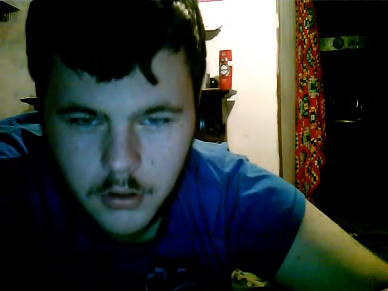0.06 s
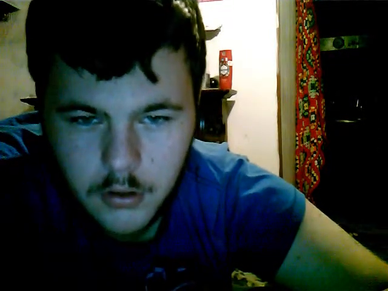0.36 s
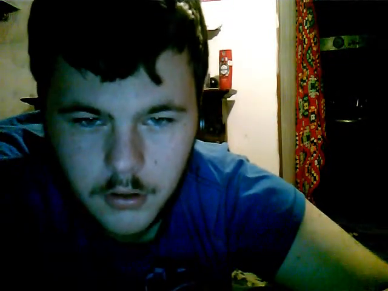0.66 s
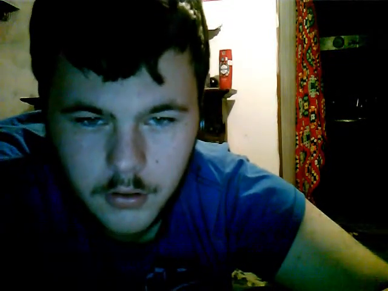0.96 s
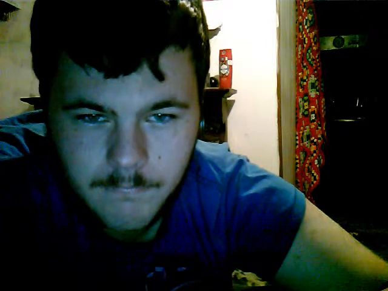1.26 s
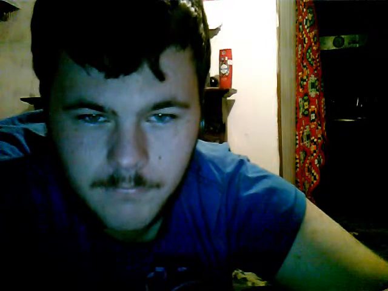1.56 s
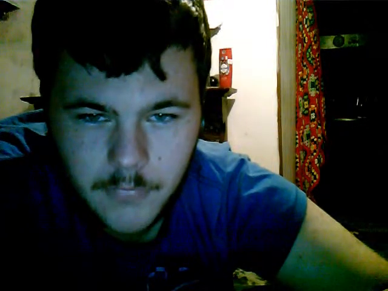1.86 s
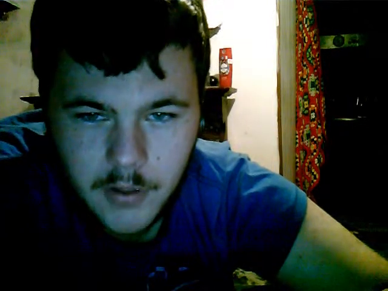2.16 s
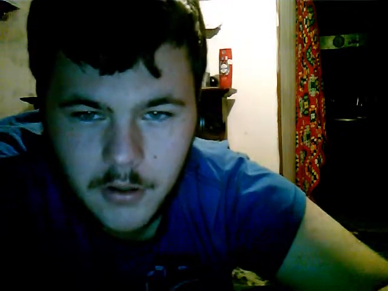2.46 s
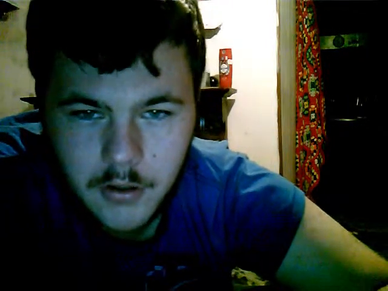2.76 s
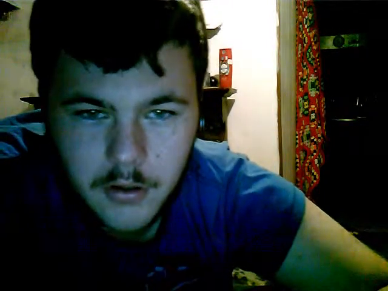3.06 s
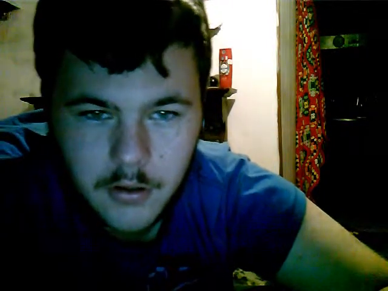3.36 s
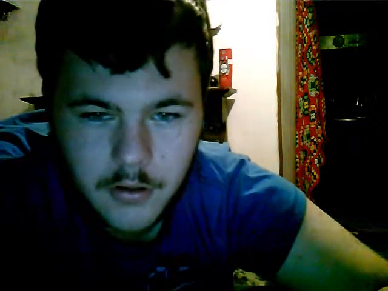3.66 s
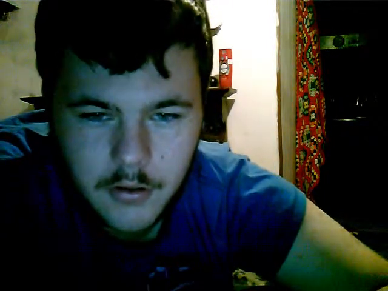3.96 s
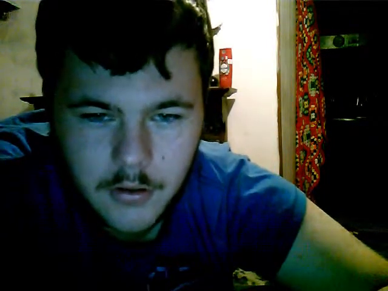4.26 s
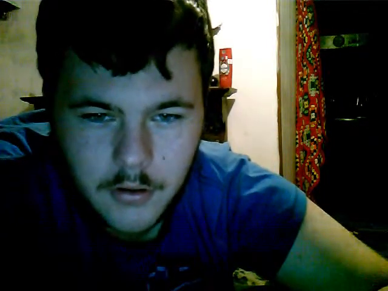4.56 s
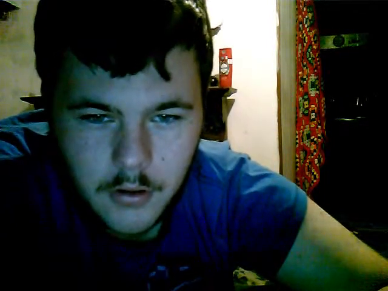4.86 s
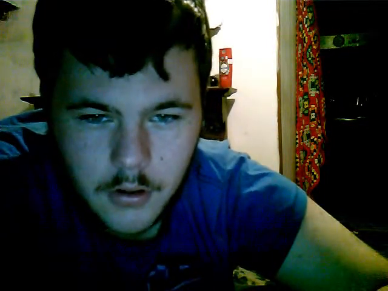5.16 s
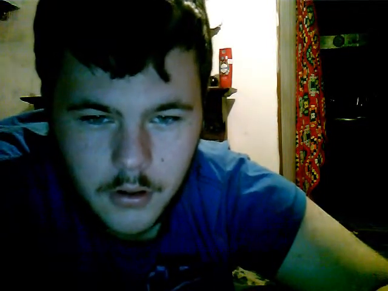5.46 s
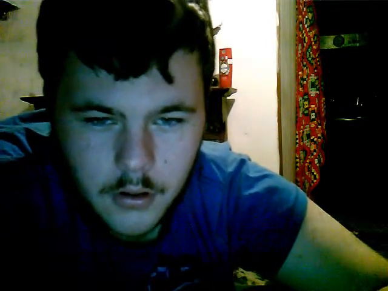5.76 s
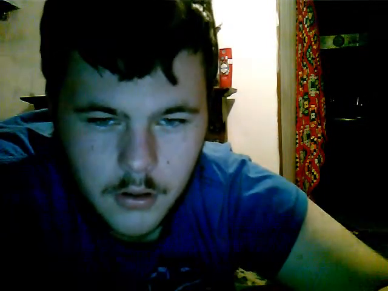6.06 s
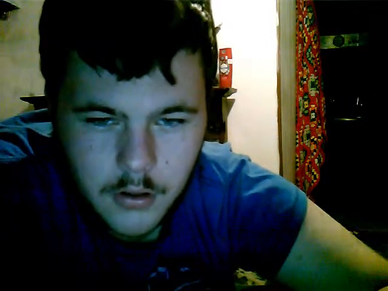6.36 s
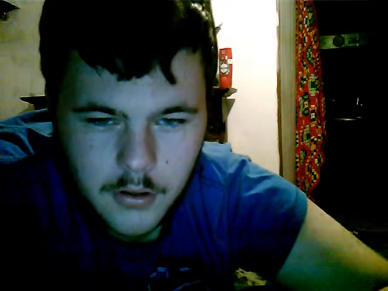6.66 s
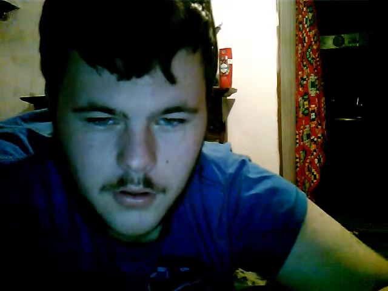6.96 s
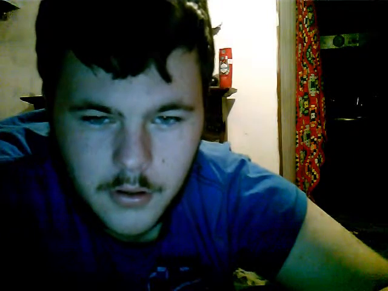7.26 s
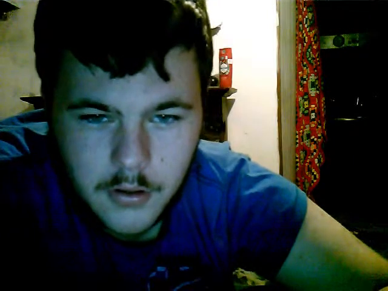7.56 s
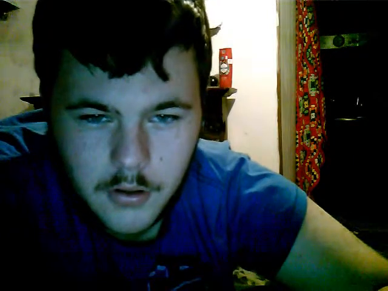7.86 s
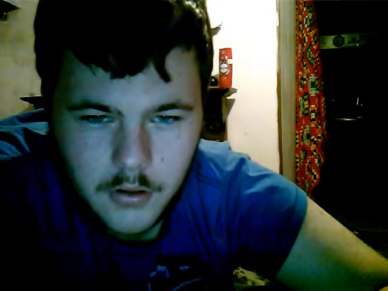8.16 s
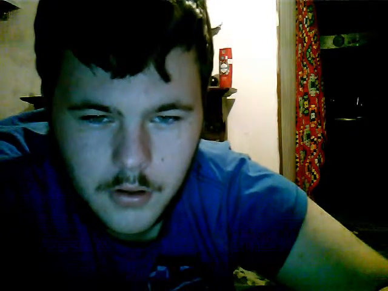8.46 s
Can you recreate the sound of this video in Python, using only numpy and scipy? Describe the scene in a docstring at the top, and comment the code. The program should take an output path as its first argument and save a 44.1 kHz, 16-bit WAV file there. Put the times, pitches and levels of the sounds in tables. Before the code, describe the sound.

Heard through a webcam microphone on a desk, a computer mouse is clicked four times in a small room: one quick click, one held longer, then two close together. The button snaps sharply going down and knocks more softly coming up, each time with a short room ring that is quickly cut back. A low, steady computer fan runs underneath, and a few faint ticks and soft bumps come before and after the clicks.

```python
"""A desk in a small, quiet room, heard from a webcam microphone: a computer fan, a few faint ticks.
About two seconds in, after a brief low blur, a mouse button is pressed and let go four times. Each
snap of the switch rings the shell and travels through the desk top to the microphone, treble first.
A noise gate lets the room ring for about a tenth of a second after each click, then turns it and the
fan down. A few more faint, dull sounds follow the last click."""
import sys
import numpy as np
from scipy import signal
from scipy.fft import rfft, irfft, next_fast_len
from scipy.io import wavfile

SR = 44100
rng = np.random.default_rng(int(sys.argv[2]) if len(sys.argv) > 2 else 0)


def to_wav(s):
    """Save 16-bit WAV."""
    ch = np.atleast_2d(s).T  # columns
    pcm = np.round(np.clip(ch, -1, 1) * 32767)  # PCM
    wavfile.write(sys.argv[1], SR, pcm.astype(np.int16))


N = 375467
GATE_DEPTH_DB = 12.5


def mouse(release_db=0.3):
    """The mouse on the desk: the press is a bright snap, the release a duller knock."""
    # button strokes: (pressed at [s], let go at [s], firmness of the press [dB])
    strokes = [(2.1369, 2.3428, 0.9), (3.055, 3.8877, .2), (5.7088, 5.9748, 0), (6.2260, 6.7698, 0.2)]
    out = np.zeros(N)
    for press_s, release_s, press_db in strokes:
        add(out, press_s, from_db(press_db) * snap(let_go=False))
        # the spring lifts the button with the same force every time
        add(out, release_s, from_db(release_db) * snap(let_go=True))
    return out


def snap(let_go, lag_at_1khz_s=.002294, air_db=-13, air_lead_s=.0007, air_low_hz=1200,
         soft_hz=6400, hard_hz=8500, vary_db=0.9, size=16384):
    """One snap of the switch rings every mode and reaches the microphone by desk and by air."""
    # modes of desk, shell and switch spring: (pitch [Hz], t60 [s], pressed [dB], let go [dB])
    modes = [(116,0.07,-49,-40), (156,0.07,-36,-30), (212.7,0.1,-32.5,-29), (298,0.042,-42.5,-41.5),
             (382.2,0.1,-33,-31), (413.7,0.078,-30,-28.5), (453,0.073,-30.5,-27), (512,0.042,-22.5,-23),
             (653.3,0.054,-16,-15.5), (837,0.044,-28.5,-28), (791,0.075,-31,-32.5), (1051,0.058,-23,-25),
             (1141,0.056,-27,-34.5), (1227,0.025,-17.5,-24), (1310,0.035,-14.5,-26.5),
             (1653,0.013,-19.5,-26.5), (1984,0.016,-27,-32), (2970,0.0087,-33,-38.5), (3647,0.0087,-25,-39),
             (4270,0.013,-29.5,-39), (4810,0.015,-32,-46.5), (5886,0.069,-45,-68.5),
             (6370,0.04,-46.5,-69.5), (7340,0.018,-58.5,-75), (9500,0.03,-63.5,-91), (10000,.1,-59,-86)]
    hz = np.fft.rfftfreq(size, 1 / SR)
    s, ring = 2j * np.pi * hz, 0
    for k, (mode_hz, t60, press_db, release_db) in enumerate(modes):
        level_db = (release_db if let_go else press_db) + vary_db * rng.standard_normal()
        gain = (-1) ** k * from_db(level_db)   # neighbouring modes swing in opposite directions
        ring = ring + gain * s / ((s + np.log(1000) / t60) ** 2 + (2 * np.pi * mode_hz) ** 2)
    # bending waves in the desk top: travel time goes as 1 / sqrt(frequency), so the bass comes last
    desk = np.exp(-4j * np.pi * lag_at_1khz_s * np.sqrt(1000 * hz))
    # a thin tick straight through the air arrives just ahead of them
    air = from_db(air_db) * s / (s + 2 * np.pi * air_low_hz)
    click = irfft(ring * (air + desk * np.exp(-s * air_lead_s))) * SR
    # the button comes back up against a softer stop
    top_hz = soft_hz if let_go else hard_hz
    return signal.sosfilt(signal.butter(6, top_hz, fs=SR, output="sos"), click)


def room(x, build_s=.004, echo_top_hz=1100, bands=36):
    """The small room around the desk: two dull near reflections and a tail that dies band by band."""
    # near reflections: (delay [s], level [dB])
    reflections = [(.00937, -12.5), (.0184, -16.5)]
    # diffuse tail: (frequency [Hz], level [dB], t60 [s])
    reverberation = [(80, -4.5, 0.32), (200, -14.5, 0.25), (300, -5, 0.29), (400, -8.5, 0.21),
                     (520, -14, 0.25), (640, -18.5, 0.79), (800, -9, 0.5), (990, -9.5, 0.5),
                     (1380, -8.5, 0.36), (1700, -15, 0.56), (2388, 0.5, 0.32), (3650, -12.5, 0.29),
                     (4740, -18, 0.21), (5800, -1.5, 0.15), (7960, -17.5, 0.084), (10000, -10.5, .12)]
    t = np.arange(SR // 2) / SR
    hz = np.fft.rfftfreq(len(t), 1 / SR)
    echoes = np.zeros(len(t))
    for delay, level_db in reflections:
        echoes[round(delay * SR)] = from_db(level_db)
    response = irfft(rfft(echoes) / np.sqrt(1 + (hz / echo_top_hz) ** 4), len(t))
    white = rfft(rng.standard_normal(len(t)))
    edges_hz = np.geomspace(45, 11000, bands + 1)
    for low, high in zip(edges_hz, edges_hz[1:]):
        level_db, t60 = at_hz(reverberation, np.sqrt(low * high))
        band = irfft(white * ((hz >= low) & (hz < high)), len(t))
        tail = band * dying(t, t60) * np.minimum(t / build_s, 1)
        # at 0 dB the tail carries as much energy as the direct sound in its band
        response += from_db(level_db) * rms_one(tail) * np.sqrt(2 * (high - low) / SR / len(t))
    return signal.fftconvolve(x, response)[:N]


def faint_sounds():
    """Faint ticks that all ring alike, one thin tick, and short low sounds."""
    # faint dull ticks, mostly in pairs: (time [s], level [dB])
    ticks = [(0.484, -74), (1.001, -65.5), (1.038, -64), (1.178, -63), (5.001, -67), (5.175, -70),
             (7.072, -65), (7.165, -67), (8.216, -64)]
    # short low sounds: (time [s], level [dB], centre [Hz])
    # the third is a brief low blur just ahead of the first click
    lows = [(.135, -61, 200), (1.05, -62, 254), (2.123, -52, 449), (7.715, -64.5, 142), (7.862, -66, 208)]
    out = np.zeros(N)
    for at_s, level_db in ticks:
        add(out, at_s, from_db(level_db) * burst(hz=1135, width_hz=1320, t60=.28))
    for at_s, level_db, hz in lows:
        add(out, at_s, from_db(level_db) * burst(hz, width_hz=1.05 * hz, t60=.36))
    # one thin, high tick just before the first stroke
    add(out, 1.894, from_db(-66.5) * burst(hz=4050, width_hz=1320, t60=.054))
    return out


def burst(hz, width_hz, t60, rise_s=.0041, onset_db=-0.6, onset_t60=.036):
    """A small burst of noise: a brief onset on top of a longer blur."""
    t = np.arange(SR // 2) / SR
    onset = from_db(onset_db) * dying(t, onset_t60)
    envelope = np.minimum(t / rise_s, 1) * (dying(t, t60) + onset)
    return envelope * noise_band(hz, width_hz, order=6, size=len(t))


def fan(rush_db=-68, waver_s=.02):
    """The computer fan in the background: a steady rush and a few tones whose pitch wavers."""
    # fan rush and microphone hiss: (frequency [Hz], relative spectral level [dB])
    rush = [(15, -34.5), (25, -7.5), (59, 0.5), (164, -5.5), (190, -3), (216, -6), (506, -5.5), (560, -9.5),
            (667, -11.5), (737, -13.5), (1380, -17), (2110, -24), (3960, -25), (6870, -33), (10000, -65.5),
            (13000, -87), (22000, -120)]
    # mains hum and fan tones: (pitch [Hz], rms level [dB], width [Hz])
    tones = [(59.8, -82.5, 6.7), (121, -85.5, 1.4), (193.5, -81.5, 5.5), (244.5, -81.5, 4.4),
             (684, -79, 2.3), (1372, -85.5, 43)]
    out = from_db(rush_db) * noise(lambda f: from_db(at_hz(rush, f)[0]))
    for hz, level_db, width_hz in tones:
        pitch = hz + width_hz / 2 * noise_band(0, 1 / waver_s)
        out += from_db(level_db) * np.sqrt(2) * np.sin(2 * np.pi * np.cumsum(pitch) / SR)
    return out


def gate(x, close_s=.026):
    """The microphone's noise gate: each band opens just ahead of a loud sound, holds, slides shut."""
    # gate bands: (upper edge [Hz], opens above [dB], hold [s])
    bands = [(2350, -24, 0.082), (5380, -39, 0.072), (11000, -46, .026)]
    t = np.arange(N) / SR
    out, rest = 0, x
    for top_hz, opens_db, hold_s in bands:
        band = signal.sosfiltfilt(signal.butter(8, top_hz, fs=SR, output="sos"), rest)
        rest = rest - band
        loud = np.roll(np.abs(band[0]), -SR // 250) > from_db(opens_db)   # looks 4 ms ahead
        quiet_for = t - np.maximum.accumulate(np.where(loud, t, -1))
        shut = np.clip((quiet_for - hold_s) / close_s, 0, 1)
        out = out + band * from_db(-GATE_DEPTH_DB * shut)
    return out


def from_db(db):
    """Decibels to gain."""
    return 10 ** (np.asarray(db) / 20)


def rms_one(x):
    """Scale to rms 1."""
    return x / np.sqrt(np.mean(x ** 2) + 1e-20)


def at_hz(points, hz):
    """Read the columns of a table along a log-frequency axis."""
    knots, *columns = np.transpose(points)
    return [np.interp(np.log(np.maximum(hz, 1)), np.log(knots), c) for c in columns]


def dying(t, t60):
    """Falls by 60 dB every t60 seconds."""
    return np.exp(-np.log(1000) * t / t60)


def noise(gain_at, size=N):
    """Noise whose gain is a function of frequency; rms 1."""
    padded = next_fast_len(size)
    spectrum = rfft(rng.standard_normal(padded)) * gain_at(np.fft.rfftfreq(padded, 1 / SR))
    return rms_one(irfft(spectrum, padded)[:size])


def noise_band(hz, width_hz, order=2, size=N):
    """Noise gathered around one frequency; a higher order gives steeper sides."""
    return noise(lambda f: 1 / (1 + np.abs(2 * (f - hz) / width_hz) ** order), size)


def add(out, at_s, sound):
    """Mix a sound in from at_s on."""
    start = round(at_s * SR)
    out[start:start + len(sound)] += sound[:N - start]


def scene():
    """Clicks in the room over the background, whose levels are given as heard through the shut gate."""
    clicks = mouse()
    return (clicks + room(clicks) + from_db(GATE_DEPTH_DB) * (fan() + faint_sounds()))[None]


def record(dry, cutoff_hz=10200):
    """The webcam microphone gates the sound, then cuts the top steeply."""
    return signal.sosfilt(signal.ellip(10, .1, 80, cutoff_hz, fs=SR, output="sos"), gate(dry))


dry = scene()
out = record(dry)
to_wav(out)
```